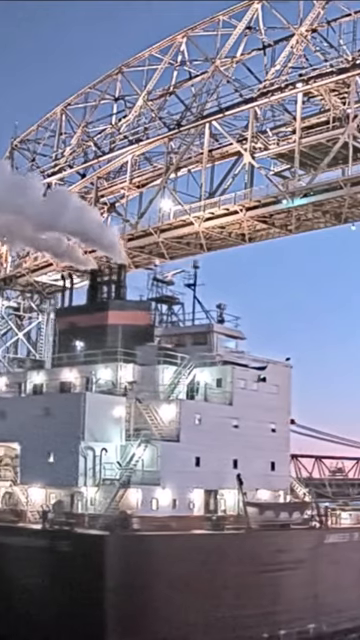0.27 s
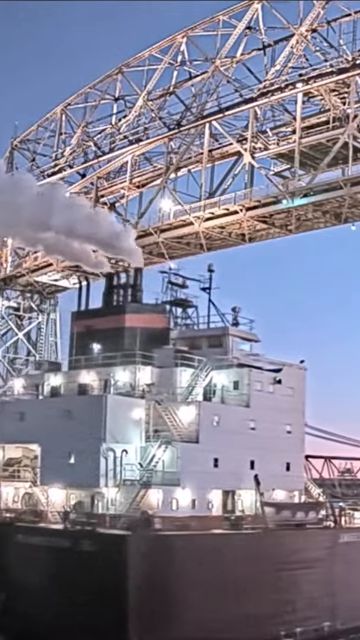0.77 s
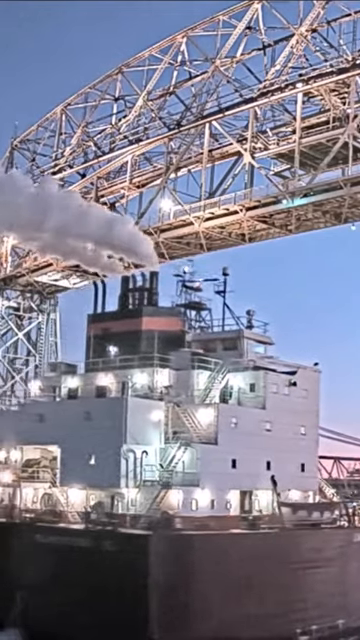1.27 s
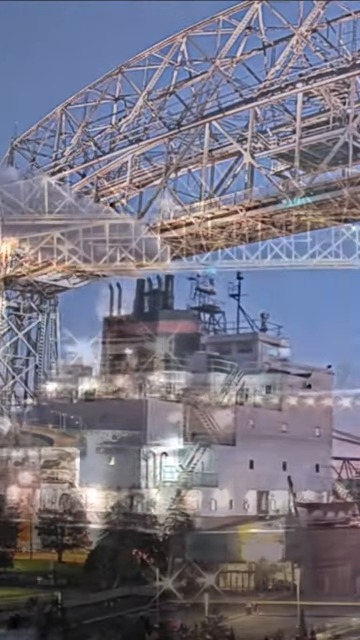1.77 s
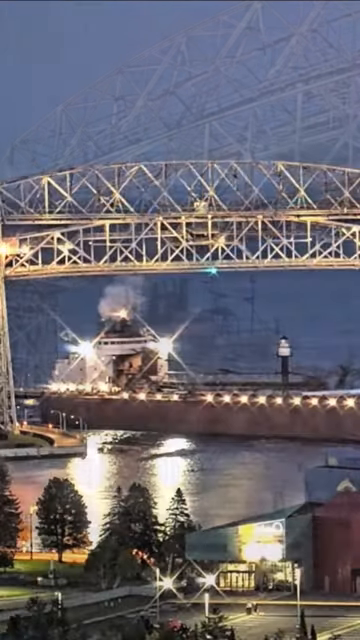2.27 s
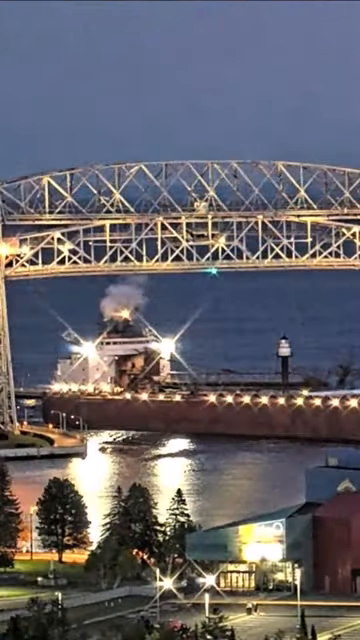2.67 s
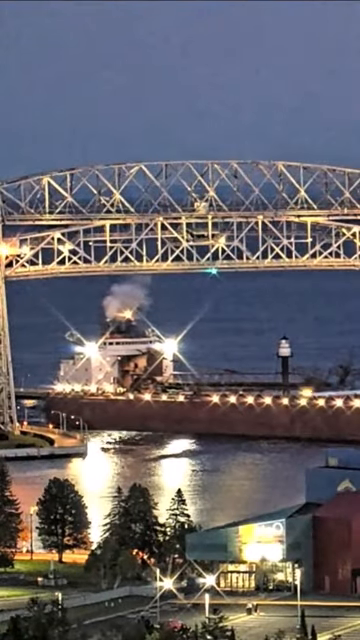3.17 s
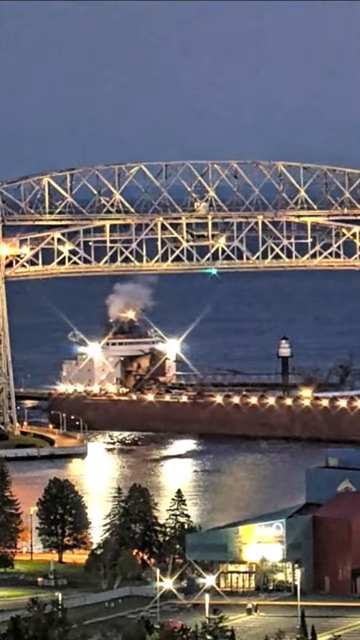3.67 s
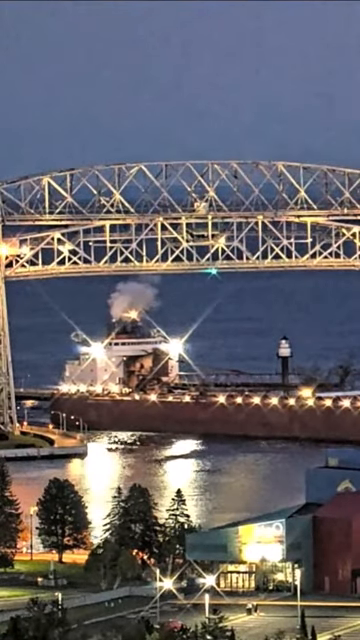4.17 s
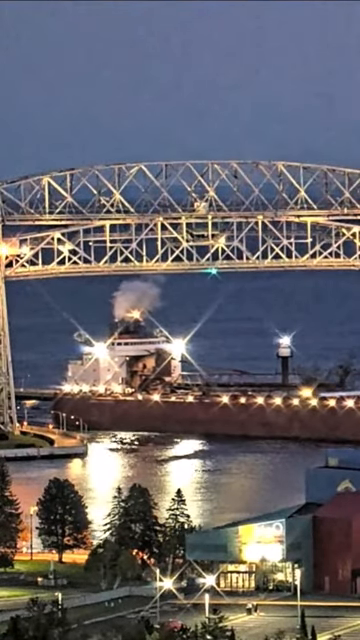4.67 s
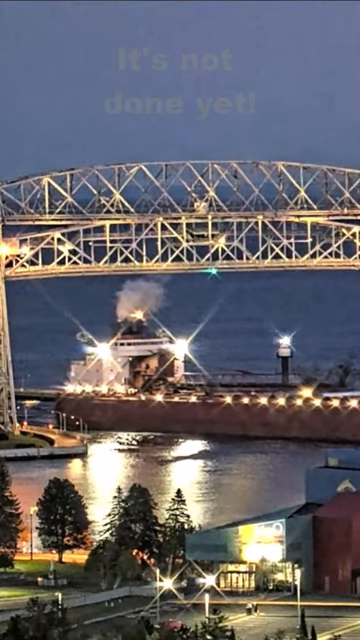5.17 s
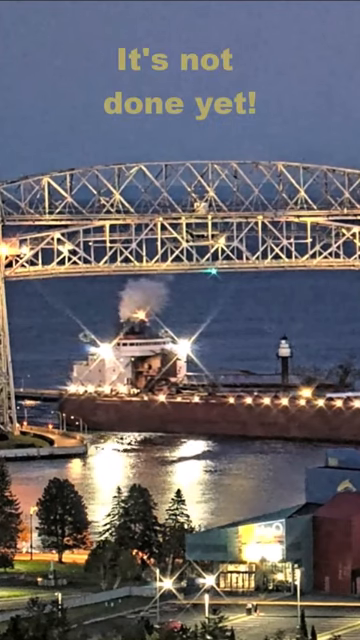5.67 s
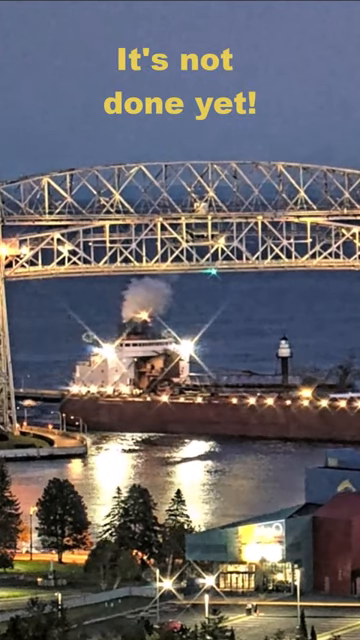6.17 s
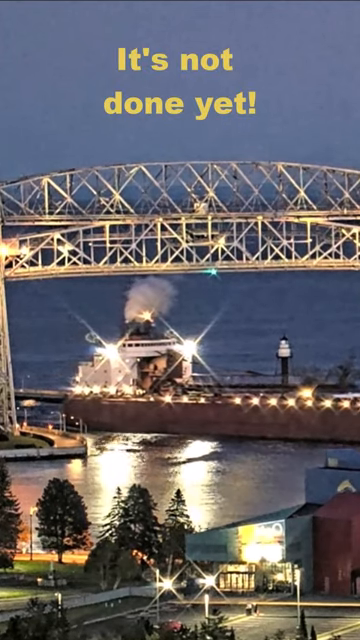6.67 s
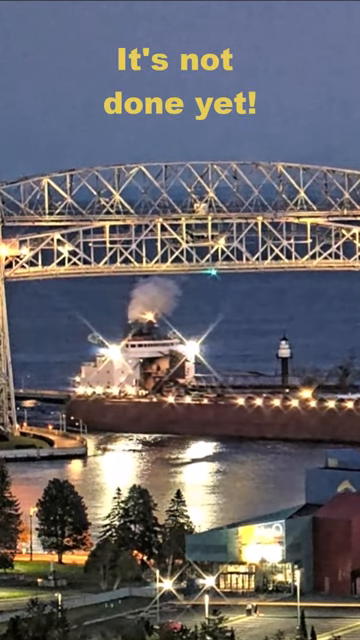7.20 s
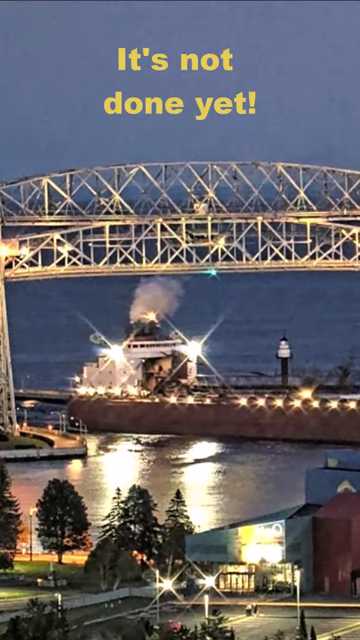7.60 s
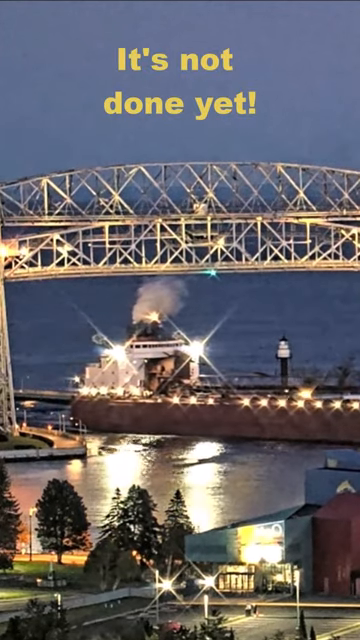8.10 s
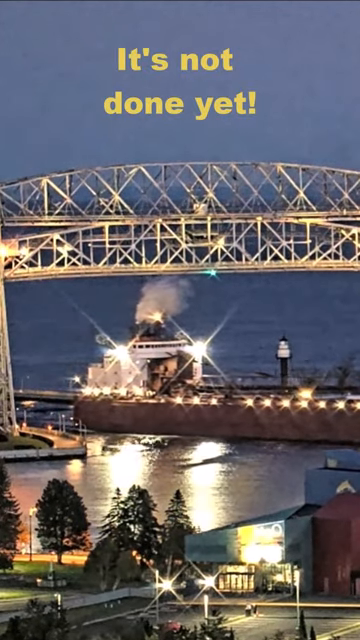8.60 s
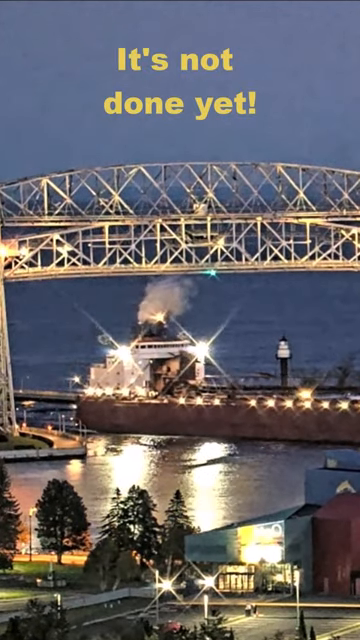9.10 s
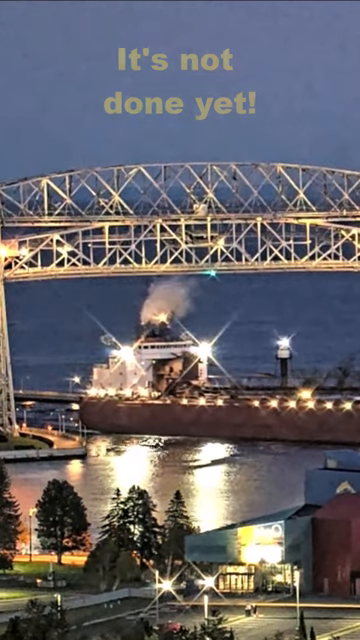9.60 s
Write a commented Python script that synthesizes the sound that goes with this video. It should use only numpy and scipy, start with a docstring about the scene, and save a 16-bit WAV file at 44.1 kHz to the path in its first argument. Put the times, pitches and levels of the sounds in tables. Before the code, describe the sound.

A large ship sounds one long, loud, steady horn blast of two deep tones together over a low harbor rumble.

```python
"""Ship's air horns in a harbour canal

Two horns about a fifth apart: the high one speaks first, the low one joins. Their diaphragms chop air
into buzzing pulse trains whose partials swell and fade with reflections off water and steel as the
ship moves. Small splashes and a valve whistle come before the blast; the harbour rumbles throughout.
A cheap outdoor microphone overloads and clips flat."""
import sys
import numpy as np
from scipy import signal
from scipy.fft import rfft, irfft, next_fast_len
from scipy.io import wavfile
from scipy.ndimage import uniform_filter1d

SR = 44100
rng = np.random.default_rng(int(sys.argv[2]) if len(sys.argv) > 2 else 0)


def dump_mix(stems):
    """Bounce the given channels to the path in sys.argv[1] as a 16-bit WAV at rate SR."""
    frames = np.atleast_2d(stems).T  # one column per channel
    limited = np.clip(frames, -1, 1)  # hard clip at full scale
    pcm = np.round(limited * 32767).astype(np.int16)
    wavfile.write(sys.argv[1], SR, pcm)


N = 434385
SOUND_M_S = 343

# Air pressure building. Each row: time in seconds, gain in dB, dullness in dB per octave.
HIGH_PRESSURE = [(1.06, -63.5, -6), (1.08, -25, 1), (1.1, -10, 6), (1.12, 1.5, 3.5), (1.14, 6, 3.5),
                 (1.171, -1.5, 1), (2.0, 2.5, 2), (9.85, 3, 1.5)]
# Horn voice. Each row: multiple of the diaphragm rate, relative level in dB.
HIGH_PARTIALS = [(1, -21), (2, -27.5), (3, -16), (4, -8), (5, -0.5), (6, -12.5), (7, -24), (8, -31),
                 (9, -25.5), (10, -25), (11, -23.5), (12, -22), (13, -26.5), (14, -26.5), (15, -18.5),
                 (16, -22), (17, -22), (18, -27.5), (19, -31), (20, -37), (21, -28.5), (22, -35), (23, -37),
                 (24, -33), (25, -39), (26, -38.5)]
# Reflections off water, hull and bridge steel. Each row: extra path beyond whole wavelengths in metres,
# its growth in metres per second, gain in dB, cutoff in Hz.
HIGH_REFLECTIONS = [(0.098, -0.069, -4.6, 860), (1.52, -0.1355, -12.1, 959), (1.907, 0.0736, -14.6, 2168),
                    (2.381, 0.0978, -7.4, 539), (2.521, 0.1896, -19.8, 2808), (2.527, 0.2635, -17.4, 1052)]
# Brassy edge. Each row: time in seconds, relative level in dB.
HIGH_BRASS = [(1.1, -43.5), (1.15, -33), (1.3, -38), (1.6, -37), (2, -33), (9.85, -50)]


def high_horn():
    """The faster diaphragm, which speaks first and abruptly."""
    steady_hz = 116.08
    cycles = diaphragm(steady_hz, sharp_hz=6, half_settled_s=1.08, settle_s=.08) + .1007
    return horn(cycles, steady_hz, HIGH_PRESSURE, HIGH_PARTIALS, HIGH_REFLECTIONS, HIGH_BRASS,
                tone_db=-13.5)


# Pressure, voice, reflections and edge of the low horn. Each row: as for the high horn.
LOW_PRESSURE = [(1.4, -60, 3), (1.55, -24, 3), (1.7, -11, 7.8), (1.8, -5, 6), (1.87, -4.5, 4.9),
                (1.93, -0.5, 2.9), (2.0, -5, 0.5), (2.3, -2.1, 1.53), (9.85, -2, 1.3)]
LOW_PARTIALS = [(1, -10), (2, -8.5), (3, -12), (4, -2), (5, -8.5), (6, -9.5), (7, -1), (8, 3.5), (9, -8.5),
                (10, -9.5), (11, -16.5), (12, -16.5), (13, -17.5), (14, -19), (15, -28.5), (16, -31),
                (17, -15.5), (18, -16.5), (19, -23.5), (20, -28), (21, -23.5), (22, -14.5), (23, -8),
                (24, -17.5), (25, -28), (26, -23), (27, -22.5), (28, -38), (29, -39), (30, -30.5)]
LOW_REFLECTIONS = [(.6, -.68, -12, 250), (.76, -.0123, -12.2, 2981), (1.059, .1049, -3.1, 434),
                   (2.488, -.0637, -8.6, 1033), (2.682, .0844, -6.6, 829), (2.781, .1126, -11.3, 851),
                   (3.646, .245, -15.1, 842), (3.662, .1706, -3.1, 398), (3.8, -.8, -12, 170),
                   (4.015, -.2864, -11.5, 426)]
LOW_BRASS = [(1.9, -25), (3, -23), (4, -23.5), (4.8, -23.5), (5.6, -28), (6.201, -24.5), (6.7, -22),
             (7.3, -20), (8.001, -21.5), (9, -24.5), (9.85, -24)]


def low_horn():
    """The slower diaphragm, which swells in as its pressure builds."""
    steady_hz = 76.76
    cycles = diaphragm(steady_hz, sharp_hz=2.3, half_settled_s=1.87, settle_s=.1) + .3
    return horn(cycles, steady_hz, LOW_PRESSURE, LOW_PARTIALS, LOW_REFLECTIONS, LOW_BRASS, tone_db=-5)


def diaphragm(steady_hz, sharp_hz, half_settled_s, settle_s, jitter=.0007):
    """Cycle count heard on the quay: the pitch starts sharp, settles, then sinks as the ship recedes."""
    departure_s, acceleration_m_s2 = 4.4, .062
    t = np.arange(N) / SR
    source_hz = steady_hz + sharp_hz / (1 + np.exp((t - half_settled_s) / settle_s))
    receding_m_s = acceleration_m_s2 * np.maximum(t - departure_s, 0)
    heard_hz = source_hz * (1 - receding_m_s / SOUND_M_S)
    return np.cumsum(heard_hz * (1 + jitter * drift(60))) / SR


# Low, noisy roar that follows the blast. Each row: frequency in Hz, relative density in dB.
ROAR_SPECTRUM = [(15, 2), (60, -3.5), (200, -2), (600, 0.5), (1000, -10), (2000, -17), (4000, -49)]
FLUTTER_RAD, SHIMMER_DEPTH = .006, .045
WANDER_DB, WANDER_ABOVE_HZ = 2, 800


def horn(cycles, steady_hz, pressure, partials, paths, brass, tone_db):
    """Diaphragm pulses through the bell, with roar and edge; low pressure gives a quiet tone."""
    multiples, voice_db = np.transpose(partials)
    pressure_db, dull_db_oct = curves(pressure)
    step = 64
    ticks = np.arange(0, N, step)
    fundamental = np.exp(2j * np.pi * cycles)
    tone, carrier = 0, 1
    for k, db, phase in zip(multiples, voice_db, minimum_phase(multiples, voice_db)):
        flutter = FLUTTER_RAD * k * drift(25, step)  # moving air shakes short waves more
        wander_db = WANDER_DB * drift(1.5, step) * (k * steady_hz > WANDER_ABOVE_HZ)  # many faint paths
        partial_db = db + wander_db + pressure_db[ticks] - dull_db_oct[ticks] * np.log2(k)
        gain = undb(partial_db) * np.exp(1j * (phase + flutter))
        gain *= reflections(k * steady_hz, paths, ticks / SR)
        carrier = carrier * fundamental
        tone = tone + (np.interp(np.arange(N), ticks, gain) * carrier).imag
    voice_rms = np.sqrt(np.sum(undb(voice_db) ** 2) / 2)
    shimmer = 1 + SHIMMER_DEPTH * drift(120)  # fast and random, roughens the tone
    tone *= undb(tone_db) / voice_rms * shimmer
    roar = noise(ROAR_SPECTRUM) * undb(tone_db + pressure_db - 20.5)
    edge_octaves = 4.94  # above the fundamental
    edge = brassy_edge(cycles) * undb(curves(brass)[0] + pressure_db - edge_octaves * dull_db_oct)
    valve_open = np.arange(N) / SR > pressure[0][0]
    return valve_open * (tone + roar + edge)


def minimum_phase(multiples, voice_db, size=128):
    """Partial phases in radians that make each cycle a blow followed by ringing."""
    spectrum = undb(np.interp(np.arange(size + 1), multiples, voice_db))
    cepstrum = irfft(np.log(spectrum))
    cepstrum[1:size] *= 2
    cepstrum[size + 1:] = 0
    return rfft(cepstrum).imag[multiples.astype(int)]


# Bell resonances. Each row: frequency in Hz, width per filter pass in Hz, relative gain in dB.
BELL_MODES = [(2779, 476, 13.5), (3860, 440, 3.5), (5560, 2300, -16), (9000, 7400, -28)]
# Air rasping through the throat. Each row: frequency in Hz, relative density in dB.
RASP_SPECTRUM = [(300, -36), (1000, -2), (2000, -2), (4000, 1.5), (7000, -8.5), (11000, -34), (16000, -38)]


def brassy_edge(cycles, scatter_db=1.5, puff_decay_cycles=.45, puff_db=-1.5):
    """Each time the diaphragm snaps open, a crack rings the bell and a puff of air follows."""
    cracks = np.diff(np.floor(cycles), prepend=0) * undb(scatter_db * rng.standard_normal(N))
    ring = sum(undb(db) * resonate(cracks, hz, width_hz) for hz, width_hz, db in BELL_MODES)
    puffs = np.exp(-(cycles % 1) / puff_decay_cycles) * noise(RASP_SPECTRUM)
    flicker = undb(1.5 * drift(10))
    return (ring / ring.std() + undb(puff_db) * puffs / puffs.std()) * flicker


def reflections(hz, paths, t):
    """Complex gain of direct plus reflected sound: changing paths make a partial swell and fade."""
    gain = 1
    for extra_m, growth_m_s, db, cutoff_hz in paths:
        strength = undb(db) / (1 + (hz / cutoff_hz) ** 4)
        delay_s = (extra_m + growth_m_s * t) / SOUND_M_S
        gain = gain + strength * np.exp(-2j * np.pi * hz * delay_s)
    return gain


def canal_echoes(blast, t60_s=1.6, build_s=.17):
    """Diffuse echoes from walls, hull and bridge steel."""
    t = np.arange(int(1.5 * SR)) / SR
    tail = rng.standard_normal(len(t)) * 1000 ** (-t / t60_s) * np.clip(t / build_s, 0, 1)
    return signal.fftconvolve(blast, tail / np.sqrt(np.sum(tail ** 2)))[:N]


# Valve leak. Each row: time in seconds, level in dB.
LEAK_LEVEL = [(1.02, -80), (1.045, -49), (1.09, -48), (1.13, -64)]
# Its whistle. Each row: frequency in Hz, relative density in dB.
LEAK_SPECTRUM = [(900, -40), (1250, 0), (1600, -13), (2050, -18), (2450, 5), (2900, -35), (5000, -29),
                 (6500, -27), (8000, -50)]


def valve_leak():
    """Air whistles in the valve, loudest just before the high horn speaks."""
    return undb(curves(LEAK_LEVEL)[0]) * noise(LEAK_SPECTRUM)


# Splashes. Each row: start in seconds, level in dB, rise in seconds, 60 dB decay time in seconds.
QUAY_SPLASHES = [(.275, -48, 0.019, 0.17), (.625, -36.5, 0.048, 0.59), (.895, -42.5, .04, 0.7)]
# Water noise. Each row: frequency in Hz, relative density in dB.
SPLASH_SPECTRUM = [(180, -33), (300, -8.5), (441, -28), (586, 1), (790, -30), (848, -20), (1210, -18.5),
                   (1400, -23), (1700, -17), (2200, -33), (2600, -30), (3890, -49), (5300, -33),
                   (9000, -62), (11700, -94), (19800, -120)]


def splashes():
    """Short washes of water by the quay."""
    t, envelope = np.arange(N) / SR, 0
    for start_s, db, rise_s, t60_s in QUAY_SPLASHES:
        attack = np.clip((t - start_s) / rise_s, 0, 1)
        decay = 1000 ** (-np.maximum(t - start_s - rise_s, 0) / t60_s)
        envelope = envelope + undb(db) * attack * decay
    return envelope * noise(SPLASH_SPECTRUM) * undb(2 * drift(39.1))


# Harbour rumble. Each row: frequency in Hz, relative density in dB.
HARBOUR_SPECTRUM = [(3, -12), (10, 0), (20, -7), (33, -16.5), (140, -15.5), (190, -22), (233, -20),
                    (278, -29.5), (599, -15), (814, -37.5), (1800, -40), (2850, -61), (4400, -66),
                    (9000, -74), (11700, -100), (19800, -120)]


def harbour(level_db=-41):
    """Engine and town rumble, flickering a little."""
    return noise(HARBOUR_SPECTRUM) * undb(level_db + 1.5 * drift(12))


def undb(db):
    """Decibels to amplitude."""
    return 10 ** (np.asarray(db) / 20)


def curves(table):
    """Value columns of a timed table at every sample."""
    times_s, *columns = np.transpose(table)
    return [np.interp(np.arange(N) / SR, times_s, column) for column in columns]


def drift(rate_hz, step=1):
    """Smooth random drift of spread near 1, one value every step samples."""
    targets = rng.standard_normal(int(N / SR * rate_hz) + 3)
    knots = uniform_filter1d(np.repeat(targets, 8), size=8)
    return 1.2 * np.interp(np.arange(0, N, step) / SR * rate_hz * 8, np.arange(len(knots)), knots)


def noise(spectrum):
    """Noise of rms 1 with the given spectral shape."""
    hz, db = np.transpose(spectrum)
    size = next_fast_len(N)
    bins_hz = np.fft.rfftfreq(size, 1 / SR) + 1
    gain = undb(np.interp(np.log(bins_hz), np.log(hz), db))
    shaped = irfft(rfft(rng.standard_normal(size)) * gain, size)[:N]
    return shaped / shaped.std()


def resonate(x, hz, width_hz):
    """Steep resonance: the same band-pass twice."""
    b, a = signal.iirpeak(hz, hz / width_hz, fs=SR)
    return signal.lfilter(b, a, signal.lfilter(b, a, x))


def scene():
    """Both horns and their echoes over the harbour, in mono."""
    blast = high_horn() + low_horn()
    return (blast + undb(-19) * canal_echoes(blast) + valve_leak() + harbour() + splashes())[None]


CLIP_LEVEL, KNEE_SHARPNESS = .43, 35
COUPLING_HZ, STREAM_HZ, TOP_HZ = 4.6, 48000, 15735


def record(dry):
    """The preamp clips flat; a crude rate change repeats samples and mirrors tones into the treble."""
    clipped = dry / (1 + np.abs(dry / CLIP_LEVEL) ** KNEE_SHARPNESS) ** (1 / KNEE_SHARPNESS)
    coupled = signal.sosfilt(signal.butter(1, COUPLING_HZ, "high", fs=SR, output="sos"), clipped)
    repeated = coupled[:, np.arange(N * STREAM_HZ // SR) * SR // STREAM_HZ]
    aliased = signal.resample(repeated, N, axis=1)
    return signal.sosfilt(signal.ellip(12, .2, 80, TOP_HZ, fs=SR, output="sos"), aliased)


dry = scene()
out = record(dry)
dump_mix(out)
```